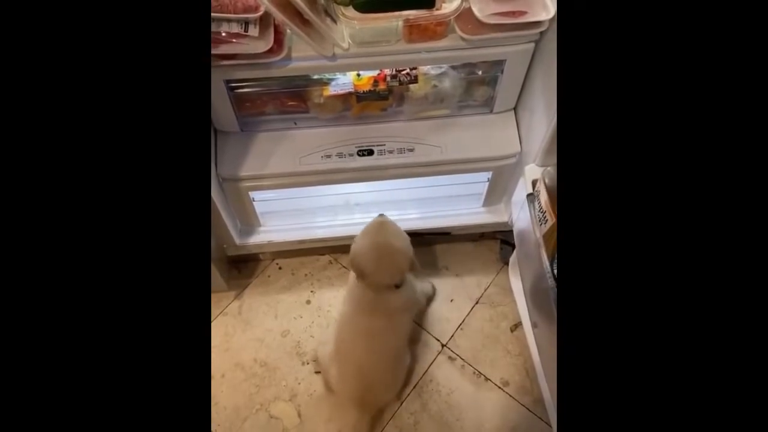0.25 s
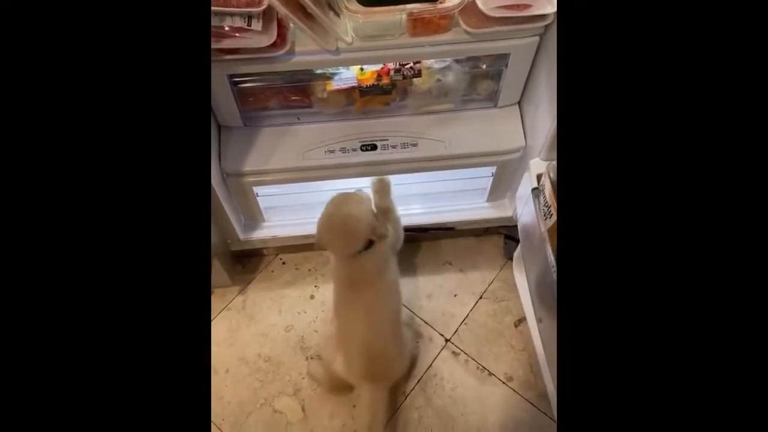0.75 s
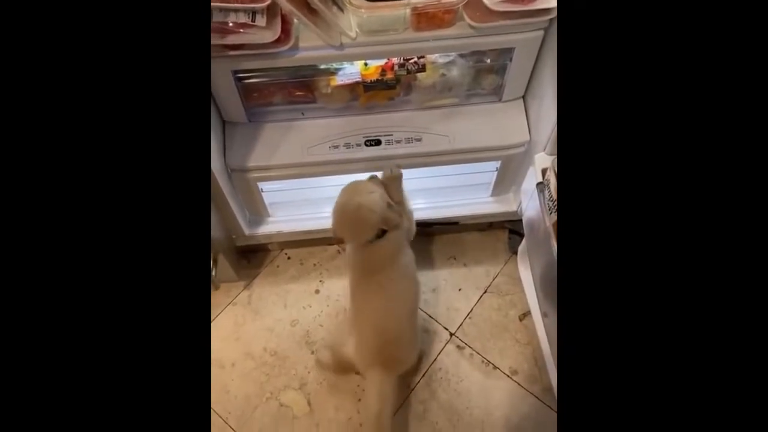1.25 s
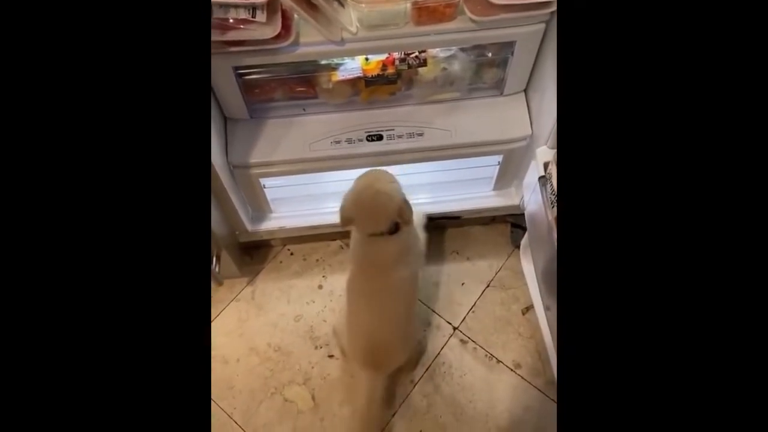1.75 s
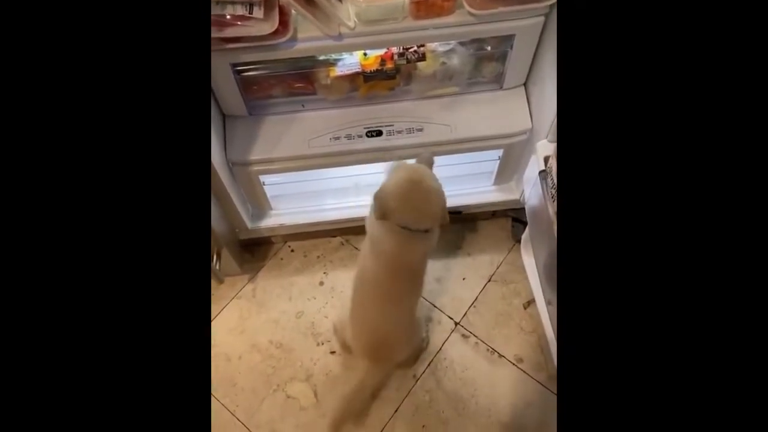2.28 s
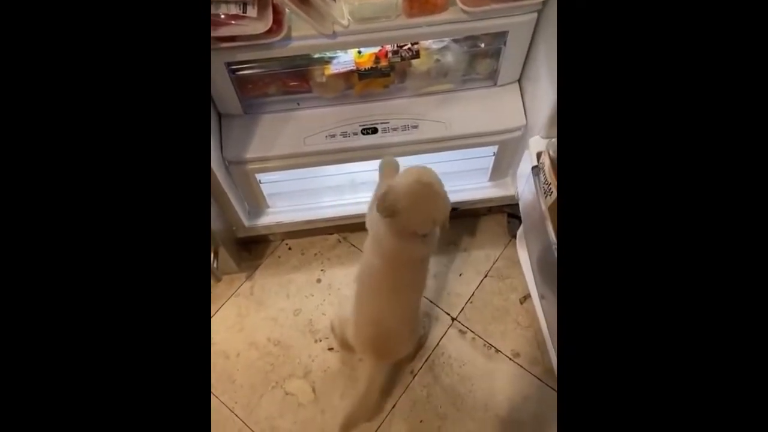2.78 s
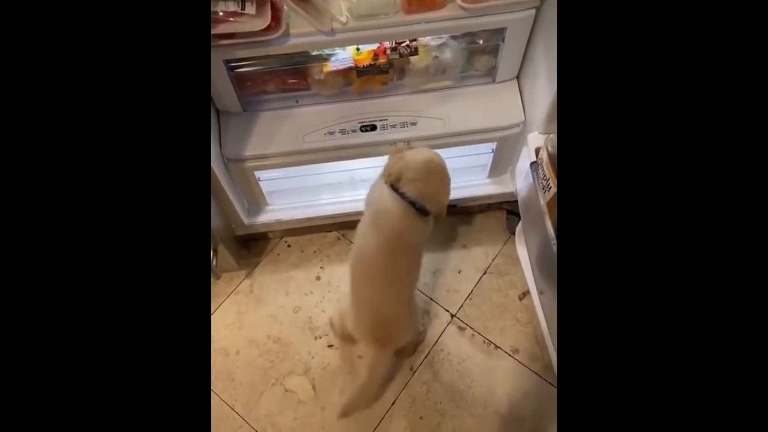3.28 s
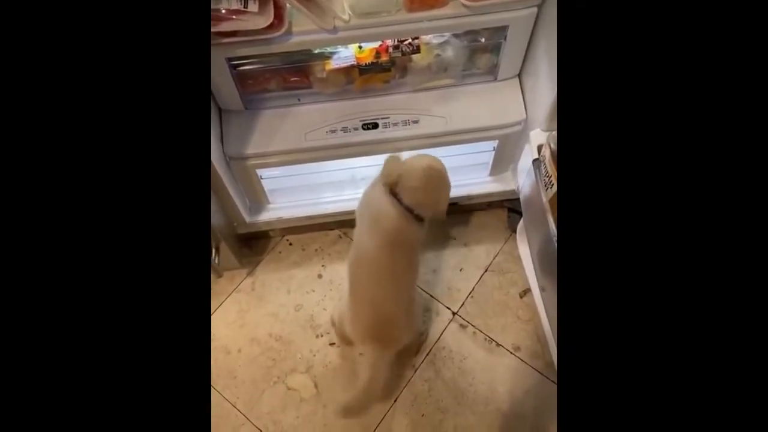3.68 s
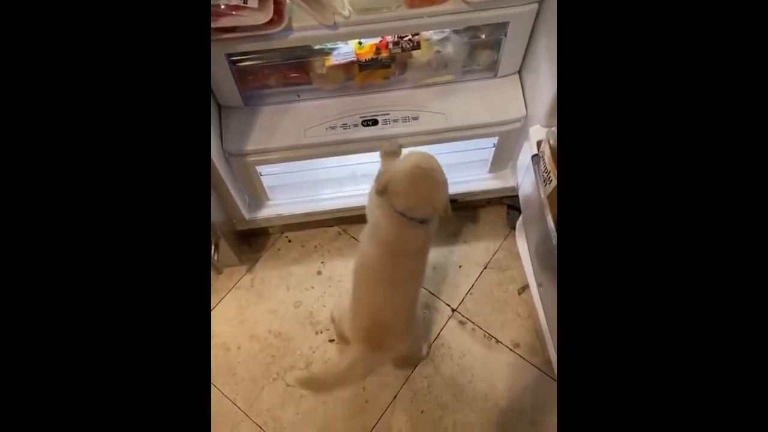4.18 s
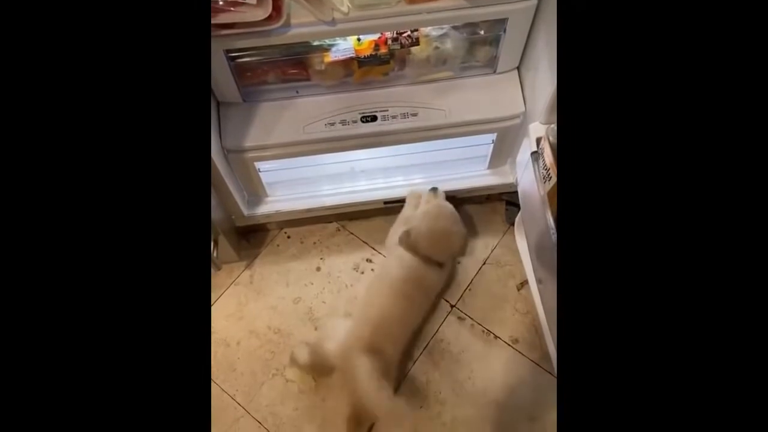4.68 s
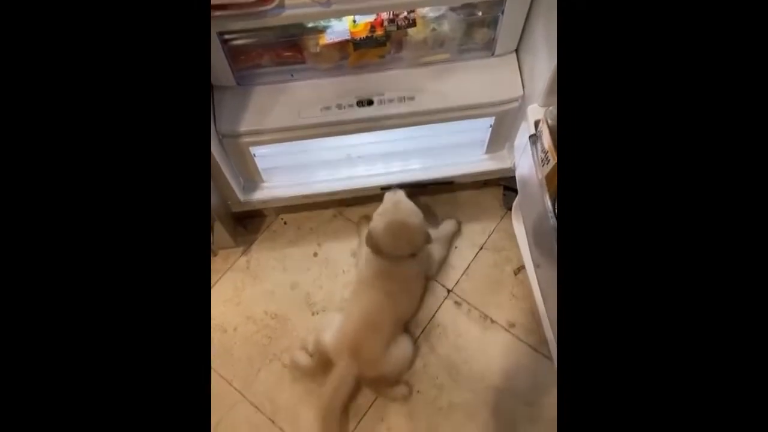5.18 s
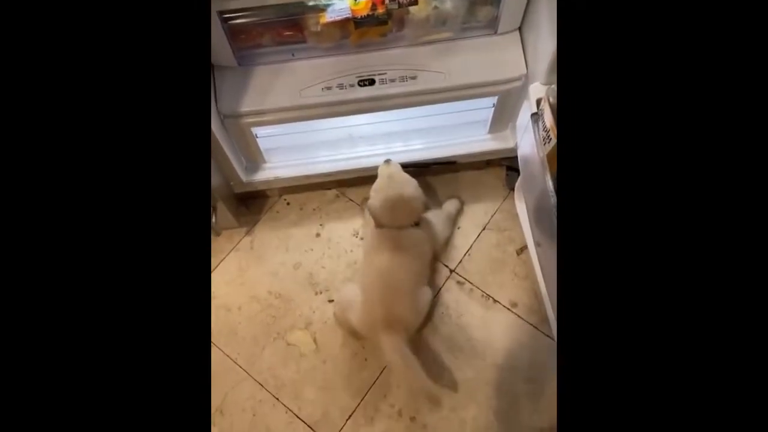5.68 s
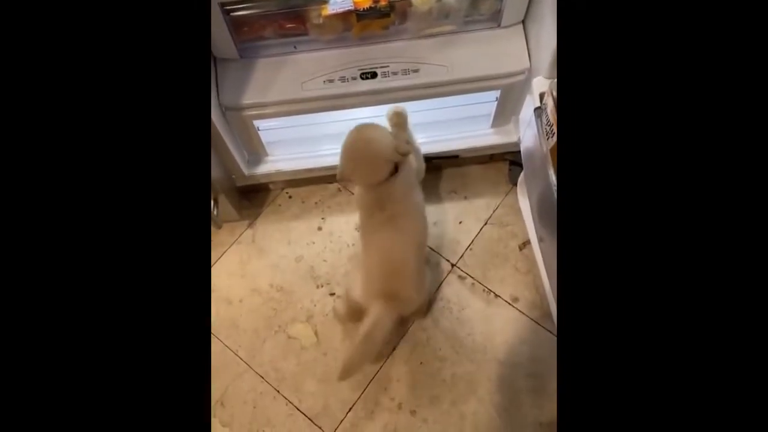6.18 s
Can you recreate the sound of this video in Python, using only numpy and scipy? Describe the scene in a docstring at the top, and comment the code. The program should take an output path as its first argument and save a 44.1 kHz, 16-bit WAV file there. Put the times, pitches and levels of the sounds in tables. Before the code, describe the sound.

A puppy's claws clack and scrape on a hollow plastic drawer, with booming thuds and soft scuffs, over low fridge hum in a kitchen.

```python
"""In a tiled kitchen, a puppy paws at the plastic freezer drawer of an open fridge.
Its claws clack: clusters of clicks ring the thin plastic front. Its pads push the hollow drawer, which
booms and knocks in its decaying modes; later come duller bumps. Paws and fur scuff in tiny noise grains,
claws snag and judder along the plastic, and the fridge hum and a treble hiss are shaped noise.
Random echoes make the room; the near microphone has two closely spaced ports."""
import sys
import numpy as np
from scipy import signal
from scipy.fft import rfft, irfft, next_fast_len
from scipy.io import wavfile

SR = 44100
rng = np.random.default_rng(int(sys.argv[2]) if len(sys.argv) > 2 else 0)


def file_out(sig):
    """Save sig as 16-bit WAV at sys.argv[1]."""
    # one column per channel
    cols = np.atleast_2d(sig).T
    # limit, then scale
    lim = np.clip(cols, -1, 1)
    pcm = np.round(lim * 32767).astype(np.int16)
    wavfile.write(sys.argv[1], SR, pcm)


N = 284445
FREQS = np.fft.rfftfreq(next_fast_len(N + SR // 2, True), 1 / SR)

# Pads, claws and fur sliding: start_s, length_s, level_db (before the mix), lightness_db
# (high: fur fizzes; low: a loaded pad rubs)
STROKES = [(0, 0.056, -56, -3), (0.101, 0.21, -76, -4), (0.402, 0.06, -56.5, -1.5), (.47, .08, -63.5, -0.5),
           (0.551, 0.96, -68, -2.5), (1.01, 0.2, -61, 0.5), (1.36, .13, -63.5, -8), (1.603, 0.16, -63, -1),
           (1.82, 0.084, -58.5, -8.5), (2.455, 0.27, -57, 1), (2.699, 0.43, -62.5, 4.5),
           (3.109, 0.12, -71.5, -4), (3.58, 0.14, -67.5, 3.5), (3.841, 0.15, -69, 2),
           (4.041, 0.8, -63.5, -4), (4.345, 0.26, -55, -3), (4.745, 0.023, -64.5, 1.5),
           (4.947, 0.18, -90.5, 21.5), (5.221, 0.087, -93, 18.5), (5.352, 0.048, -90, 23.5),
           (6.17, 0.34, -68.5, 3.5)]
# The whole paw on the drawer, claws first and then the pad: start_s, clack_db,
# sharpness_db (relative to the clack), claw_tip_tick_db, clack_pitch (factor), landing_spread_s,
# struck_spot_hz, pad_push_db, boom_hz, runner_knock_db, knock_hz,
# rebound_db (relative to the push), paw_damping_s
SWIPES = [(0.785, -35.5, -11.5, -76.5, 0.67, 0.0019, 1300, -41, 80, -44, 586, -4, .4),
          (1.133, -58.5, 4.5, -69.5, 0.49, .003, 2400, -40.5, 74.4, -53, 324, -14.5, .3),
          (1.328, -24.5, -7.5, -32.5, 0.97, .001, 1350, -28, 94, -29, 192, -16, .4),
          (1.556, -48.5, 0.5, -42, 0.95, 0.0043, 2750, -25, 96.7, -37, 226, -13, .4),
          (1.744, -53.5, -24, -78, 1.1, 0.0018, 1150, -26.5, 108, -31, 249, -12, .05),
          (1.886, -44.5, -10.5, -66.5, 1.05, 0.0031, 1420, -33, 70, -44, 409, -12.5, .2),
          (2.131, -56.5, -14.5, -88, 0.88, 0.0033, 1250, -33, 90.5, -36, 375, -20.5, .12),
          (2.35, -33.5, 4.5, -42, 1.03, 0.0015, 2800, -25, 91, -35.5, 346.6, -29, .07),
          (2.417, -48.5, 4.5, -72, 0.77, 0.001845, 2200, -26, 86.5, -38.5, 410, -15.5, .2),
          (2.578, -38.5, 2.5, -32.5, 0.91, 0.0028, 1950, -20.5, 110, -28.5, 213, -12, .06),
          (2.963, -41.5, 4.5, -27.5, 1.01, .0018, 2800, -27, 97, -41, 287, -21.5, .3),
          (3.426, -54, -6, -60.5, 0.75, .003, 1400, -24.5, 107, -38.5, 348, -9.5, .3),
          (3.549, -52, -0.5, -60, 1.004, 0.005, 2400, -48, 99, -49.5, 294, -5, .3),
          (3.793, -48, -3.5, -34.5, 0.97, 0.0011, 2500, -26.5, 99.8, -40.5, 282, -18, .2),
          (4.014, -54.5, 7.5, -43.5, 1, 0.0017, 4400, -35, 88, -40.5, 280, -11, .3),
          (4.19, -47, -3, -52, 1.03, .003, 2780, -28, 116.5, -30.5, 274.3, -13.5, .2),
          (4.3, -35.5, 4.5, -30.5, 1.05, .0018, 2850, -20.5, 82, -32.5, 374, -17, .07),
          (4.389, -50.5, 6, -44.5, 1.3, .0013, 2600, -39, 80.4, -39, 301, -12.5, .1),
          (4.444, -43, -14, -55.5, 1.08, 0.00086, 1560, -33.5, 85.5, -39.5, 300, -11, .2),
          (4.505, -49, 0, -48, 1, .001, 2750, -35, 75, -38.5, 378.8, -9, .2),
          (4.58, -84, -7, -41, 0.9, 0.0022, 1400, -37, 80.5, -39.5, 230.8, -26.5, .15)]


def amp(db):
    """Turns decibels into a gain."""
    return 10 ** (np.asarray(db) / 20)


def evened(x):
    """Scales a sound to an rms level of 1."""
    return x / np.sqrt(np.mean(x ** 2) + 1e-20)


def read(points, hz):
    """Reads a table between its points, along a logarithmic frequency axis."""
    point_hz, value = np.transpose(points)
    return np.interp(np.log(hz + 1), np.log(point_hz + 1), value)


def add(mix, start_s, sound):
    """Mixes a sound in at its start time."""
    part = mix[max(round(start_s * SR), 0):][:len(sound)]
    part += sound[:len(part)]


def shaped(x, gain):
    """Filters a sound by a gain for each frequency in FREQS."""
    return irfft(rfft(x, 2 * len(FREQS) - 2) * gain)[..., :N]


def band(x, lo_hz, hi_hz, level_db, span_s):
    """Keeps one register of a sound and sets its rms level over its first span."""
    edges = [lo_hz, min(hi_hz, .48 * SR)]
    y = signal.sosfilt(signal.butter(N=4, Wn=edges, btype="band", fs=SR, output="sos"), x)
    energy = np.sum(y[:round(span_s * SR)] ** 2)
    return amp(level_db) * y / np.sqrt(energy / (span_s * SR) + 1e-20)


def ring(modes, t, place_db):
    """Sums dying sine waves; the place of the blow makes each one louder or softer."""
    hz, level_db, t60_s = np.transpose(modes)[:, :, None]
    decay = amp(level_db + place_db[:, None] - 60 * t / t60_s)
    return np.sum(decay * np.sin(2 * np.pi * hz * t), axis=0)


def ports(left, right=None):
    """Sound from the front at the two ports; with a second, unrelated signal, a diffuse field."""
    # How far the left port leads: pitch_hz, lead_radians
    port_phase = [(100, 0), (1600, 0), (2500, .95), (4000, 1.1), (6000, 2.1), (7500, 2.8), (13000, 2.9)]
    # How much louder the left port is: pitch_hz, left_minus_right_db
    port_balance = [(120, 0), (300, 1.8), (700, 4), (1400, 1.7), (2600, 2), (4000, 0), (13000, 0)]
    # How alike diffuse sound is at the two ports: pitch_hz, likeness (1 = the same)
    port_likeness = [(150, 1), (350, 0.93), (600, 0.18), (900, 0.12), (1400, 0.57), (2400, 1), (5000, 0.61),
                     (13000, 0.11)]
    if right is None:
        right = left
    else:
        same = np.clip(read(port_likeness, FREQS), -1, 1)
        right = shaped(left, same) + shaped(right, np.sqrt(1 - same ** 2))
    # each port takes half of the difference
    lean = amp(read(port_balance, FREQS) / 2) * np.exp(.5j * read(port_phase, FREQS))
    return np.array([shaped(left, lean), shaped(right, 1 / lean)])


def fridge():
    """Compressor rumble and fan air in the cabinet's resonances, as shaped noise."""
    # Spectrum of the running fridge: pitch_hz, level_db (per Hz, before the overall level)
    hum_spectrum = [(20, -24), (40, -5), (55, 3.5), (76, -7), (115, 0), (155, -11), (188, -5), (260, -6.5),
                    (350, -5), (440, -24.5), (640, -22.5), (820, -28.5), (950, -22), (1150, -43),
                    (3000, -45.5), (13000, -58)]
    hum_db = -48
    noise = rng.standard_normal((2, N))
    hum = evened(shaped(noise, amp(read(hum_spectrum, FREQS))))
    return amp(hum_db) * ports(*hum)


def hiss():
    """Faint treble noise that dips for a moment near the end."""
    # Spectrum of the hiss: pitch_hz, level_db (per Hz, before the overall level)
    hiss_spectrum = [(1000, -6.5), (2500, -4.5), (5000, -3.5), (9000, -9.5), (13000, -3.5)]
    # Fading of the hiss: time_s, change_db
    hiss_fade = [(4.9, 0), (5.2, -2), (5.55, -3), (5.78, -11), (6.05, -11), (6.2, 0)]
    hiss_db = -69.5
    gain = amp(read(hiss_spectrum, FREQS)) * (FREQS > hiss_spectrum[0][0])
    air = evened(shaped(rng.standard_normal((2, N)), gain))
    fade_db = np.interp(np.arange(N) / SR, *np.transpose(hiss_fade))
    return amp(hiss_db + fade_db) * ports(*air)


def panel(t, place_db=3, damping_s=.014):
    """The thin plastic front, struck at a random place and damped by the paw that rests on it."""
    # Modes of the front: pitch_hz, level_db, t60_s (time to fall 60 dB, without the paw)
    front_modes = [(860, 13, 0.076), (887, 5.5, .025), (1210, -7.5, 0.074), (1324, -2.5, 0.031),
                   (1479, 1, 0.014), (1763, -5.5, 0.02), (2140, -4, 0.016), (2406, -10.5, 0.017),
                   (2587, -4, 0.014), (2825, 5, 0.0049), (3640, -1, 0.0076), (4040, -7.5, 0.017),
                   (4630, -3, 0.0088), (6160, -15, 0.0097), (7050, -13.5, 0.0079)]
    t = t[:3000]
    place = place_db * rng.standard_normal(len(front_modes))
    return np.exp(-t / damping_s) * ring(front_modes, t, place)


def scuffs(grains_per_s=900, flutter_db=4.5, clump_s=0.0156):
    """Pads, claws and fur catch and slip in many tiny grains, in uneven clumps."""
    scrape_rel_db = -2  # claws dragging, relative to the stroke
    grain_db = 3.5  # scatter in the size of the grains
    out = np.zeros((2, N))
    for start_s, length, level_db, light_db in STROKES:
        rub_db, scrape_db, fizz_db = level_db - light_db, level_db + scrape_rel_db, level_db + light_db
        t = np.arange(0, length + .06, 1 / SR)
        swell = np.interp(t, [0, length * .15, length * .75, length + .06], [0, 1, .8, 0])
        knots = np.arange(0, t[-1] + clump_s, clump_s)
        flutter = np.interp(t, knots, rng.standard_normal(len(knots)))
        press = swell * amp(flutter_db * flutter)
        for channel in out:
            scatter = np.minimum(rng.exponential(1, len(t)), 3)
            sizes = amp(grain_db * scatter) * rng.standard_normal(len(t))
            grains = press * sizes * (rng.random(len(t)) < grains_per_s / SR)
            rub = band(grains, 270, 572, rub_db, length)
            # claws ring the plastic as they drag; fur gives a finer fizz
            ringing = signal.fftconvolve(grains, panel(t))[:len(t)]
            scrape = band(grains + 0.18 * ringing, 710, 6000, scrape_db, length)
            fine = grains + 0.9 * press * rng.standard_normal(len(t))
            fizz = band(fine, 3500, 12500, fizz_db, length)
            add(channel, start_s, rub + scrape + fizz)
    return ports(*out)


def catches():
    """While a paw slides, its claws snag at random: light taps that follow the level of the stroke."""
    catches_per_s, catch_db = 34, -5.5  # full rate; level relative to the stroke
    full_rate_db = -55  # strokes this loud snag at the full rate, lighter ones less often
    scatter_db = 1  # the snags differ by up to this much either way
    taps = []
    for start_s, length, level_db, light_db in STROKES:
        rate = catches_per_s * min(amp(level_db - full_rate_db), 1)
        snag_db = level_db + catch_db
        # twelve possible snags, each with its own chance
        for share, chance, *scatter in rng.random((12, 4)):
            if chance < rate * length / 12:
                clack_db, sharpness_db = scatter_db * (2 * np.array(scatter) - 1)
                taps.append((start_s + share * length, snag_db + clack_db, sharpness_db,
                             snag_db + light_db))
    return taps


def claw(hollow_db, sharp_db, tick_db, spread, pitch, spot_hz, graze_db=-24, graze_s=.009,
         skid_db=-16, skid_per_spread=10, slips_per_s=4000):
    """Claws graze, land in a tight cluster of clicks and skid; each click rings the plastic front."""
    hard_spread_s = 0.0011  # the claws of a hard blow land within about this time
    lead_claw = .6  # in a hard blow, one claw's force as a share of all the others together
    clack_detune = .01  # each struck place shifts the front's modes by about this share
    spot_db, spot_q = 7, 7  # extra level and sharpness of the struck spot's resonance
    t = np.arange(5000) / SR
    since = np.maximum(t - graze_s, 0)
    u = since / (2 * max(spread, .0009))
    landing = (u * np.exp(1 - u)) ** 2
    skid = amp(skid_db) * np.exp(-since / (skid_per_spread * spread))
    drag = np.where(t < graze_s, amp(graze_db), skid)
    slips = rng.standard_normal(len(t)) * (rng.random(len(t)) < slips_per_s / SR)
    clicks = (landing + drag) * slips
    hardness = min(hard_spread_s / spread, 1) ** 3
    clicks[np.argmax(landing)] += lead_claw * hardness * np.linalg.norm(clicks)
    plastic = panel(t * pitch * (1 + clack_detune * rng.standard_normal()))
    ringing = signal.fftconvolve(clicks, plastic / np.linalg.norm(plastic))[:len(t)]
    sound = 6.5 * clicks + 7 * ringing  # bare contact next to the ringing plastic
    sound = sound + amp(spot_db) * signal.lfilter(*signal.iirpeak(spot_hz, spot_q, fs=SR), sound)
    hollow = band(sound, 1020 * pitch, 1700 * pitch, hollow_db, 0.037)
    sharp = band(sound, 1737, 5460, sharp_db, 0.038)
    # the hard claw tips tick mostly as they land
    tips = (landing + .5 * drag) * slips
    return graze_s, hollow + sharp + band(tips, 5960, 13040, tick_db, 0.014)


def snags(spread_s=0.0025):
    """Small clicks of snagging claws, each ringing a random spot of the front."""
    out = np.zeros(N)
    for start_s, clack_db, sharpness_db, tick_db in catches():
        spot_hz = 2228 * 2 ** rng.uniform(-0.76, 0.39)  # about 1300 to 2900 Hz
        add(out, start_s, claw(clack_db, clack_db + sharpness_db, tick_db, spread_s, 0.76, spot_hz)[1])
    return ports(out)


def pushes():
    """Jolts of the drawer: a swipe pushes it and lets it fall back; further low booms come singly."""
    # Further low booms of the drawer, without a second, weaker one after them: start_s, boom_db, boom_hz
    single_booms = [(.004, -42, 82), (0.967, -34, 85.1), (1.453, -38.5, 103), (1.733, -29.5, 126.3),
                    (1.844, -35, 90), (2.082, -36, 64.75), (2.188, -27, 100), (2.462, -30.5, 80),
                    (3.15, -39.5, 94.9), (4.823, -46.5, 84.7)]
    knock_rel_db, soft_knock_hz = -17, 273.6  # knock of a single boom: relative to it, and its centre
    single_hold_s = 0.17  # a single boom is damped in about this time
    pad_lag_s, rebound_s = .002, .04  # pad lands after the claws; drawer falls back after the pad
    # each jolt: start_s, boom_db, boom_hz, knock_db, knock_hz, damping_s
    jolts = [(start_s, boom_db, boom_hz, boom_db + knock_rel_db, soft_knock_hz, single_hold_s)
             for start_s, boom_db, boom_hz in single_booms]
    for start_s, *_, push_db, boom_hz, knock_db, knock_hz, rebound_db, hold_s in SWIPES:
        pad_s = start_s + pad_lag_s
        jolts.append((pad_s, push_db, boom_hz, knock_db, knock_hz, hold_s))
        jolts.append((pad_s + rebound_s, push_db + rebound_db, boom_hz,
                      knock_db + rebound_db, knock_hz, hold_s))
    return jolts


def thuds(push_s=0.0025, focus_db=14, knock_focus_db=7, jolt_s=0.0005, rattle=0.96, rattle_s=0.0072,
          place_db=3):
    """Soft pushes make the drawer boom in its low modes and knock in its runners."""
    # Modes of the whole drawer: pitch_hz, level_db, t60_s (time to fall 60 dB, without the paw)
    drawer_modes = [(53.9, -16.5, 0.17), (72.6, 1, 0.76), (98.5, 14, 0.18), (126.1, 2, 0.61),
                    (144.3, -8, 0.094), (187, 0, 0.3), (204, -10, 0.042), (248.5, -2, 0.31),
                    (284.6, -11.5, 0.081), (354, -0.5, 0.17), (392, 1, 0.11), (454, -5, 0.063),
                    (600.5, -3, 0.11), (698.4, 5, 0.039), (859, -10.5, 0.051)]
    load_detune = 0.061  # the weight of the paw shifts the modes by about this share
    out, t = np.zeros(N), np.arange(SR // 3) / SR
    mode_hz = np.transpose(drawer_modes)[0]
    for start_s, boom_db, boom_hz, knock_db, knock_hz, hold_s in pushes():
        held = np.exp(-t / hold_s)
        push = t / push_s * np.exp(-t / push_s)
        loaded = t * (1 + load_detune * rng.standard_normal())
        # modes near the boom's pitch are favoured
        low_db = -focus_db * np.log2(mode_hz / boom_hz) ** 2 + rng.standard_normal(len(mode_hz))
        boom = signal.fftconvolve(push, held * ring(drawer_modes, loaded, low_db))[:len(t)]
        # the knock: a sharp jolt and a noisy rattle, weak in the lowest modes
        noise = t / rattle_s * np.exp(-t / rattle_s) * rng.standard_normal(len(t))
        jolt = t / jolt_s * np.exp(-t / jolt_s) + rattle * noise
        upper_db = place_db * rng.standard_normal(len(mode_hz)) - 20 * (mode_hz < 140)
        upper_db = upper_db - knock_focus_db * abs(np.log2(mode_hz / knock_hz))
        knock = signal.fftconvolve(jolt, held * ring(drawer_modes, loaded, upper_db))[:len(t)]
        thud = band(boom, 0.63 * boom_hz, 2 * boom_hz, boom_db, 0.1)
        add(out, start_s - .002, thud + band(knock, 145.6, 950, knock_db, 0.063))
    return out


def claws():
    """Every landing of the claws: the direct sound, and two shares sent off into the room."""
    # Further claw taps: start_s, clack_db, sharpness_db (relative to the clack), claw_tip_tick_db,
    # landing_spread_s, struck_spot_hz
    tap_list = [(0.646, -56, -3, -58, .0011, 1500), (0.8, -43.5, -13, -50, 0.0024, 1350),
                (1.029, -75.5, 12.5, -63, 0.0014, 4260), (1.288, -60, 1, -60.5, 0.0023, 2480),
                (1.317, -51.5, 5.5, -54.5, .0015, 3200), (1.335, -42, 5.5, -33, 0.0013, 2530),
                (1.446, -51.5, 5, -52.5, .0013, 2850), (1.736, -50.5, -8.5, -66, .003, 1120),
                (1.778, -59.5, -4, -85, .0015, 1779), (1.792, -64, 4, -51, 0.0013, 2380),
                (1.828, -44, 0, -45.5, 0.0019, 2980), (1.841, -53.5, 1, -51, .001, 3900),
                (1.867, -46, -2, -40, .003, 2700), (1.878, -49, 0, -44, .0012, 2400),
                (1.894, -47.5, -5, -53.5, .001, 1450), (1.906, -46.5, -2.5, -70, 0.0027, 1390),
                (1.921, -51, -6, -48, .003, 2550), (2.174, -53.5, -0.5, -64, 0.0028, 2710),
                (2.186, -72.5, 17, -61, 0.0018, 3400), (2.21, -65.5, 8.5, -68, .0015, 3463),
                (2.427, -47, 2, -27.5, 0.002, 4500), (2.521, -58, 1, -50, 0.001, 2400),
                (2.553, -67, 12, -65, 0.0032, 2930), (2.571, -48, -10, -49, .002, 1400),
                (2.886, -76, 18, -68.5, 0.0025, 4350), (3.366, -58, 3, -60.5, .0032, 2810),
                (3.574, -57.5, -2, -56, .002, 2250), (3.744, -54, 7.5, -62.5, 0.0018, 2830),
                (4.401, -55, -7, -64, 0.0011, 2500), (4.545, -51, -0.5, -47, 0.0024, 1329),
                (4.676, -51, -6.5, -57, 0.0014, 1844), (4.764, -67, -2, -65, .003, 1456),
                (4.919, -81, 7, -81, 0.0019, 3420), (5.48, -76, -9, -90, 0.0032, 1995),
                (6.21, -69, -9, -76, .002, 1300), (6.304, -62.5, 0, -110, 0.00215, 2940)]
    # dB per dB: the duller the claw tips sound, the more goes by way of the room
    open_tick_db, room_per_dullness = -59, 0.18
    direct, *sent = np.zeros((3, N))
    landings = [row[:7] for row in SWIPES] + [(*row[:4], 1, *row[4:]) for row in tap_list]
    for start_s, clack_db, sharpness_db, tick_db, pitch, spread, spot_hz in landings:
        blow = clack_db, clack_db + sharpness_db, tick_db, spread, pitch, spot_hz
        room_db = room_per_dullness * (open_tick_db - tick_db)
        lead, sound = claw(*blow)
        begin_s = start_s - lead - spread
        add(direct, begin_s, sound)
        for way in sent:  # the panel radiates a different mix in each direction
            add(way, begin_s, amp(room_db) * claw(*blow)[1])
    return direct, sent


def scrapes(slips_per_s=380, slip_scatter_db=4, ring_t60=.55, ring_width=0.19, ring_db=-20):
    """A claw sticks and slips unevenly; the front rings, and some modes sing on once the paw has left."""
    # A claw juddering along the plastic: start_s, length_s, level_db, ring_hz
    scrape_list = [(1.866, 0.098, -49, 1395), (2.178, 0.02, -64, 3300), (4.525, 0.028, -47.5, 1454)]
    out, t = np.zeros(N), np.arange(SR // 2) / SR
    for start_s, length, level_db, ring_hz in scrape_list:
        slips = np.zeros(len(t))
        slip_s = np.cumsum(rng.uniform(.4, 1.6, 40)) / slips_per_s
        size = amp(slip_scatter_db * rng.standard_normal(40))
        during = slip_s < length
        slips[(slip_s[during] * SR).astype(int)] = size[during]
        cluster_hz = ring_hz * (1 + ring_width * rng.uniform(-1.3, 1, 10))
        cluster = [(hz, ring_db, ring_t60) for hz in cluster_hz]
        body = ring(cluster, t, np.zeros(len(cluster)))
        add(body, 0, panel(t))
        judder = signal.fftconvolve(slips, body)[:len(t)]
        add(out, start_s, band(judder, 0.77 * ring_hz, ring_hz + 3500, level_db, length))
    return out


def bumps(swell_cycles=0.65, grit_s=0.0042, top_hz=620):
    """Soft, heavily damped pushes that swell in, with a little low grit and no treble."""
    # Dull bumps that hardly ring: start_s, level_db, pitch_hz, grit_db (relative to the bump)
    bump_list = [(5.683, -16.5, 125, -22), (5.703, -11.5, 134.6, -16), (5.717, -12.5, 73, -21.5),
                 (5.737, -14, 156.2, -41), (5.751, -14, 87.6, -29), (5.789, -24, 99, -28),
                 (5.816, -24.5, 126, -37), (5.887, -25.5, 107, -36), (5.912, -33.5, 84.5, -31),
                 (6.209, -44, 245, -3)]
    out, t = np.zeros(N), np.arange(SR // 5) / SR
    for start_s, level_db, hz, grit_db in bump_list:
        u = t * hz / swell_cycles
        push = -np.sin(2 * np.pi * hz * t) * u * np.exp(1 - u)
        noise = rng.standard_normal(len(t)) * t / grit_s * np.exp(-t / grit_s)
        grit = band(noise, 150, 556, grit_db, 0.013)
        add(out, start_s, amp(level_db) * (push + grit))
    return signal.sosfilt(signal.butter(N=3, Wn=[38, top_hz], btype="band", fs=SR, output="sos"), out)


def echoes(x, t60s, delay, low_hz):
    """Diffuse reflections: sparse taps of random sign that die by band, starting after a delay."""
    taps = rng.choice([-1., 1.], (2, SR // 2)) * (rng.random((2, SR // 2)) < .2)
    hz, t, z = signal.stft(taps, SR, nperseg=128)
    t60 = read(t60s, hz)[:, None]
    z = z * amp(-60 * t / t60) / np.sqrt(t60)
    tail = signal.istft(z, SR, nperseg=128)[1]
    tail = tail / np.linalg.norm(tail, axis=1, keepdims=True)
    tail = np.pad(tail, ((0, 0), (round(delay * SR), 0)))
    wet = signal.fftconvolve(x[None], tail, axes=1)[:, :N]
    # weaken the bass below low_hz
    return ports(*shaped(wet, FREQS ** 2 / (FREQS ** 2 + low_hz ** 2)))


def scene():
    """Claws and scrapes, thrown back first by the fridge door and floor, then by the kitchen; the thuds echo in
    the kitchen alone."""
    # How long the kitchen echoes: pitch_hz, t60_s (time to fall 60 dB)
    kitchen_decay = [(100, 0.15), (400, 0.44), (1300, 0.72), (3500, 0.66), (7000, 0.37), (13000, 0.17)]
    nook_decay = [(500, 0.13), (13000, 0.022)]  # the same for the door and floor
    (clacks, sent), booms, judder = claws(), thuds(), scrapes()
    near = ports(clacks + judder) + ports(booms + bumps())
    nook = echoes(clacks + judder, nook_decay, delay=.004, low_hz=296)
    room = sum(echoes(way + booms + judder, kitchen_decay, delay=0.009, low_hz=264.4) for way in sent)
    struck = near + amp(-5.0) * nook + amp(-12.0) * room
    return struck + amp(1.5) * scuffs() + fridge() + hiss() + snags()


def record(dry):
    """The microphone's colour and the recorder's band limit."""
    # Colour of the microphone: pitch_hz, gain_db
    mic_colour = [(20, -24.5), (35, -15), (50, -6), (6300, 1.5), (8500, -2), (11000, -4.5), (13000, -3)]
    edge_hz = 13150
    heard = shaped(dry, amp(read(mic_colour, FREQS)))
    lowpass = signal.firwin(161, edge_hz, window=("kaiser", 8), fs=SR)
    return signal.oaconvolve(heard, lowpass[None], "same")


dry = scene()
out = record(dry)
file_out(out)
```